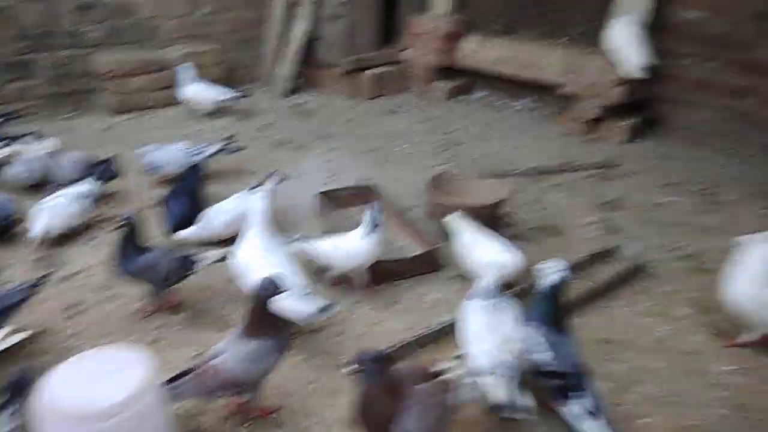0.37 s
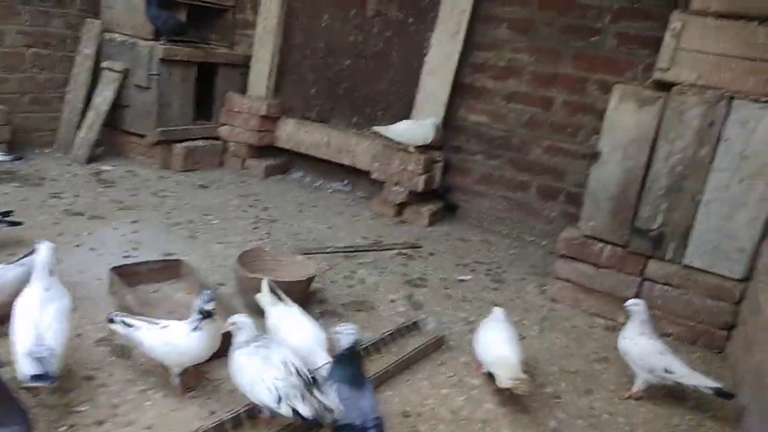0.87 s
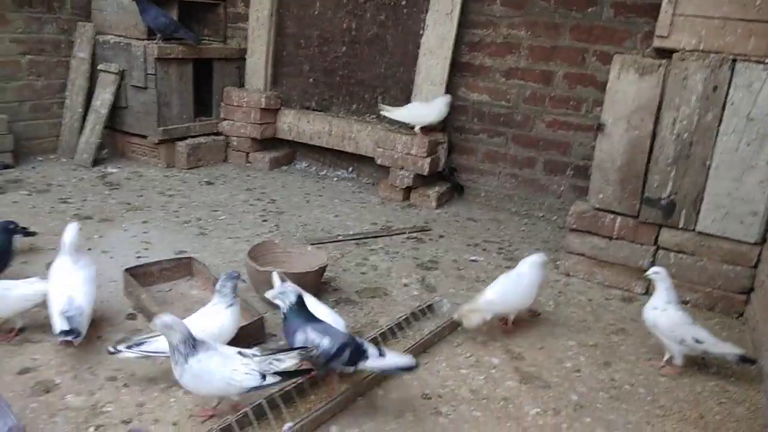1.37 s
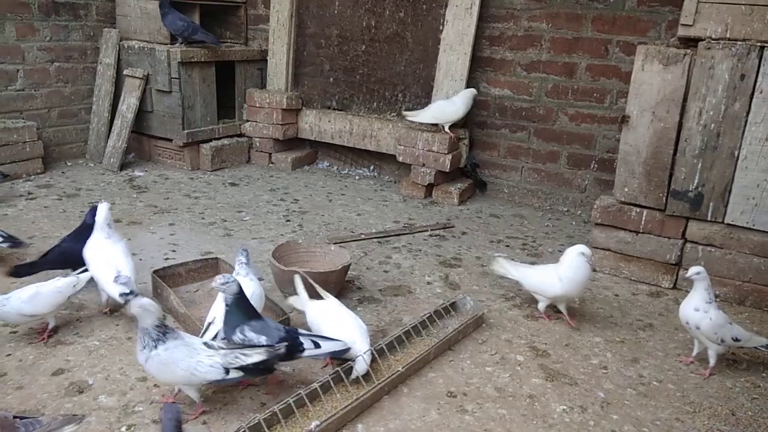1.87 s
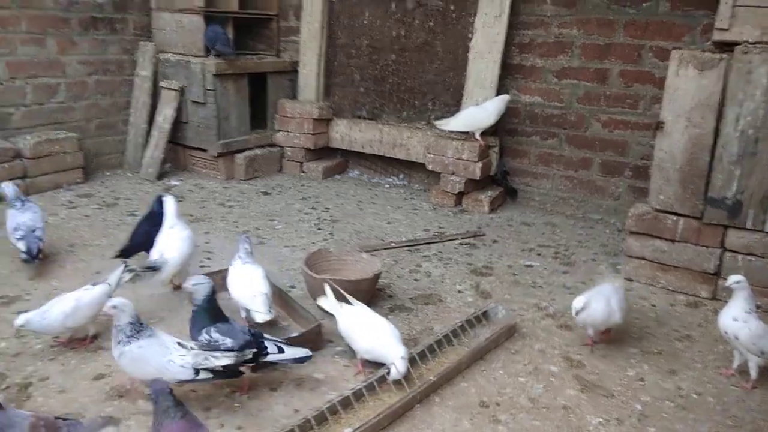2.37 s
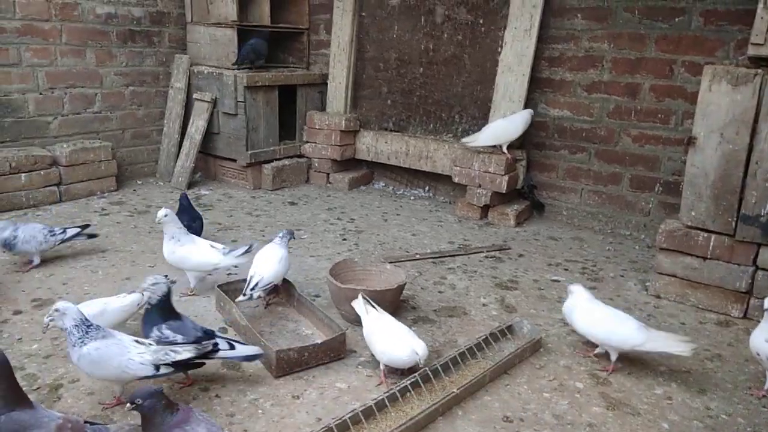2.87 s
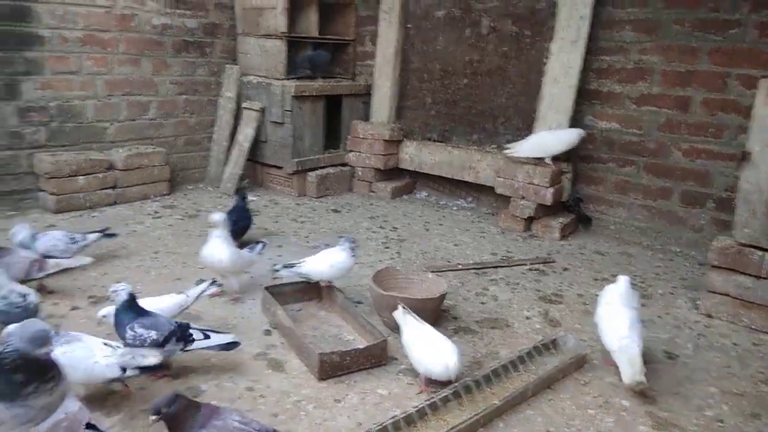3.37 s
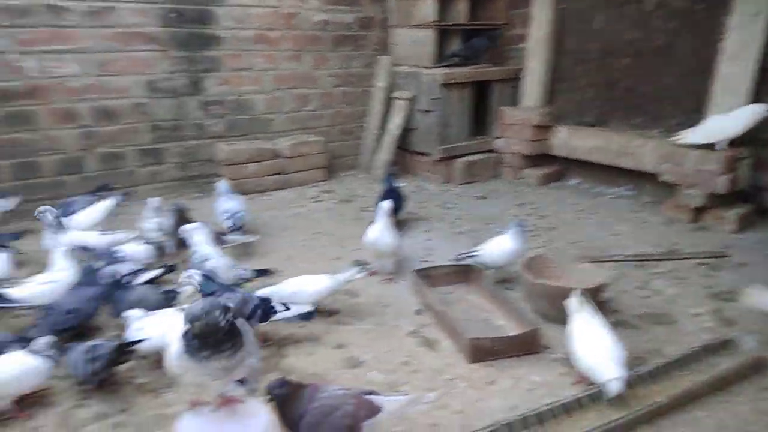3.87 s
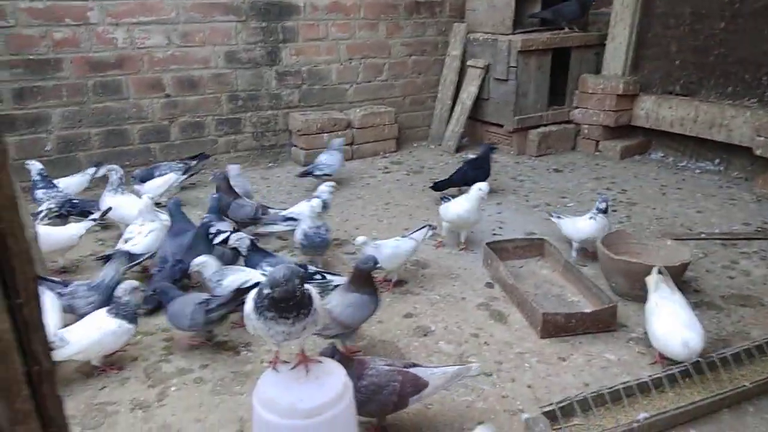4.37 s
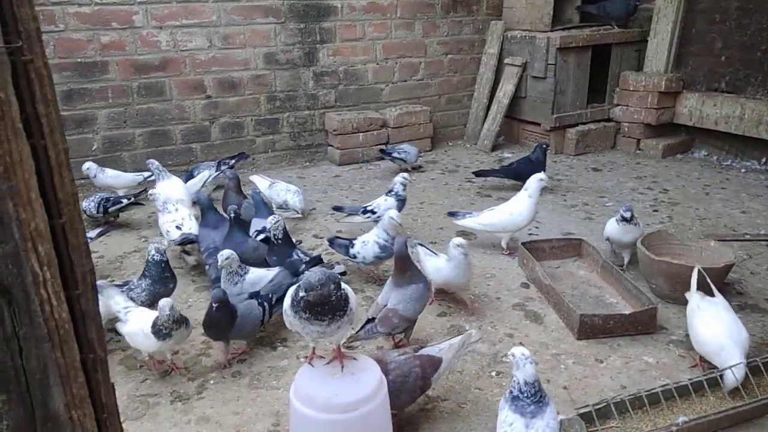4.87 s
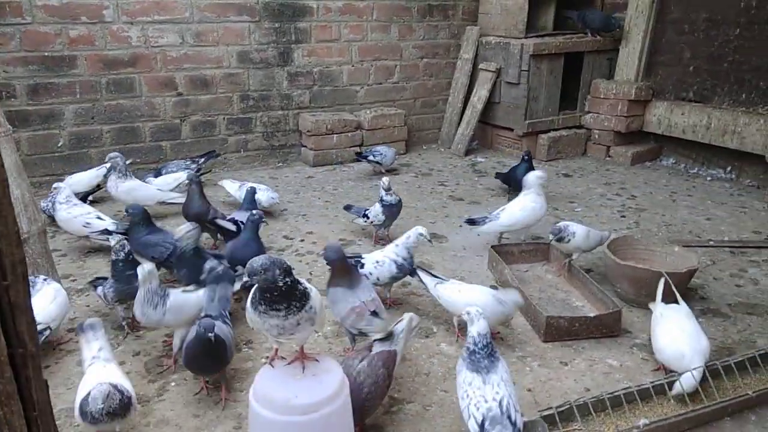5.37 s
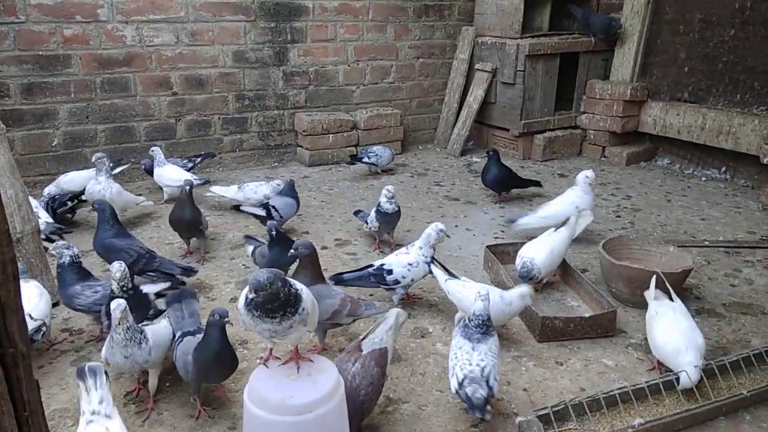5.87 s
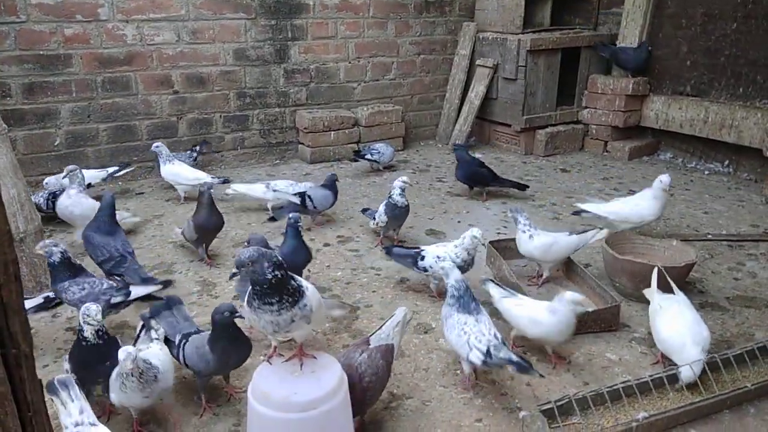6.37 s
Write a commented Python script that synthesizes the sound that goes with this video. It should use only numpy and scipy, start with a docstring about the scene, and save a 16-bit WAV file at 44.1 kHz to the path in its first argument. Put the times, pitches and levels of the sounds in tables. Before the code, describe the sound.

Many pigeons are heard close up on a dusty loft floor. Soft low cooing and hooting overlaps a flickering flock murmur. Crisp feather rustles come almost throughout, with a burst of flapping early on and tiny high squeaks. After four seconds liquid gulps cluster quickly into a rolling coo; then dry pecks and hollow taps stand out. Short, dull room echo; the bright hiss leans right because the left microphone is covered.

```python
"""A small brick loft with a flock of pigeons on its dusty floor.
Near birds gulp, hoot and coo: throat tones and puffs of air coloured by the swollen crop and the room.
Behind them many short hoots and flickering bands of noise form the murmur of the flock.
Feathers shake and wings flutter as shaped noise, beaks and claws ring the modes of a hollow trough,
and narrow bands of hiss rasp and squeak. The left microphone port is muffled."""
import sys
import numpy as np
from scipy import signal
from scipy.io import wavfile

SR = 44100
rng = np.random.default_rng(int(sys.argv[2]) if len(sys.argv) > 2 else 0)


def digitize_waveform(pressure):
    """Quantize a signal to 16-bit integers and store it at the path in sys.argv[1].

    Rows of a 2-D input are taken as channels; values are limited to [-1, 1].
    """
    field = np.atleast_2d(pressure).T
    bounded = np.clip(field, -1, 1)
    quanta = np.round(bounded * 32767).astype(np.int16)
    wavfile.write(sys.argv[1], SR, quanta)


def voltage_ratio(level):
    """Linear amplitude factor for a level in decibels (scalar or array-like)."""
    return 10 ** (np.asarray(level, float) / 20)


N = 286642

# What the crop lets out. Each row: frequency in Hz, gain in dB.
CROP_GAIN = [(200, -14), (320, -1), (430, 1.5), (520, -5.5), (620, -14), (700, -27.5), (900, -58)]
# Course of the murmur of the flock. Each row: time in seconds, level in dB.
MURMUR_COURSE = [(0, -37.5), (.2, -54.5), (.62, -43), (1.0, -41), (1.15, -50), (1.25, -40.5), (2.5, -41.5),
                 (2.8, -57), (2.95, -41), (3.15, -48.5), (3.55, -55), (4.0, -41), (4.92, -46), (5.8, -50),
                 (6.2, -51.5)]


def rms_one(x):
    """Normalization: scales a signal to unit root mean square."""
    return x / np.sqrt(np.mean(x ** 2) + 1e-20)


def in_time(rows):
    """Linear interpolation: draws each column of a table against its first column, the time in seconds."""
    seconds, *columns = np.transpose(rows)
    return [np.interp(np.arange(N) / SR, seconds, column) for column in columns]


def at_hz(points, hz):
    """Interpolation of a spectrum along a logarithmic frequency axis."""
    table_hz, values = np.transpose(points)
    return np.interp(np.log(hz), np.log(table_hz), values)


def drift(rate_hz):
    """Slow random modulation: noise smoothed by two equal low-pass poles, rms 1."""
    step = 20   # samples between the drawn points
    pole = np.exp(-2 * np.pi * rate_hz * step / SR)
    noise = rng.standard_normal(N // step + 2002)
    slow = signal.lfilter([1], [1, -2 * pole, pole * pole], noise)[2000:]   # settled part
    return np.interp(np.arange(N) / step, np.arange(len(slow)), rms_one(slow))


def banded_noise(spectrum, patchy_db, flicker_hz):
    """Subtractive synthesis: stereo noise in about third-octave bands with shared and own flicker; rms 1."""
    # Likeness of the two sides. Each row: frequency in Hz, left-right correlation.
    likeness = [(100, 0.93), (250, 0.96), (600, 0.41), (1200, 0.014)]
    out, together = 0, drift(flicker_hz)
    lowest_hz, highest_hz = spectrum[0][0], spectrum[-1][0]
    edges = lowest_hz * 2 ** np.arange(0, np.log2(highest_hz / lowest_hz) + .2, .34)
    white = rng.standard_normal((2, 2, N))   # neighbouring bands take turns with two noise pairs
    for k, (low, high) in enumerate(zip(edges, np.minimum(edges[1:], 19000))):
        band = signal.butter(2, [low, high], "band", fs=SR, output="sos")
        mid, side = signal.sosfilt(band, white[k % 2])
        hz = np.sqrt(low * high)
        alike = np.clip(at_hz(likeness, hz), -1, 1)
        flicker_db = patchy_db * (together + 2.27 * drift(flicker_hz))
        gain = voltage_ratio(at_hz(spectrum, hz) + flicker_db)
        out = out + gain * (np.sqrt(1 + alike) * mid + np.sqrt(1 - alike) * side * [[1], [-1]])
    return rms_one(out)


def tone(rows, roll, second_db, colour):
    """Source and filter: two wavering partials, coloured by the crop and throbbing with the throat's roll."""
    start, end = round(rows[0][0] * SR), round(rows[-1][0] * SR)
    hz, effort_db = (column[start:end] for column in in_time(rows))
    phase = 2 * np.pi * np.cumsum(hz * (1 + 0.0148 * drift(7.0)[start:end])) / SR
    throb_hz = 38 * (1 + .3 * drift(12)[start:end])
    throb = np.cos(2 * np.pi * np.cumsum(throb_hz) / SR)
    throb += 0.52 * drift(39)[start:end]   # hoarseness between the beats
    first = voltage_ratio(at_hz(colour, hz)) * np.sin(phase)
    second = voltage_ratio(second_db + at_hz(colour, 2 * hz)) * np.sin(2 * phase)
    rolled = (first + second) * (1 + np.clip(roll, 0, 1) * throb)
    fade = signal.windows.tukey(end - start, .12)
    out = np.zeros(N)
    out[start:end] = np.sqrt(2) * voltage_ratio(effort_db) * rolled * fade
    return out


def murmur():
    """Superposition: the voices of the flock merge into flickering bands of noise."""
    # Each row: frequency in Hz, relative density in dB per Hz.
    murmur_spectrum = [(80, -19.5), (150, -15), (210, -5.5), (300, 1), (430, -1), (560, -4.5), (800, -62)]
    level_db, = in_time(MURMUR_COURSE)
    return voltage_ratio(level_db) * banded_noise(murmur_spectrum, 2.6, 15.2)


def far_coos():
    """Frequency glide: birds further off give short falling hoots of two partials at random moments."""
    out, t = np.zeros(N + SR), np.arange(SR // 2) / SR
    for moment, pitch, length, size, upper in rng.random((140, 5)):
        hz, seconds = 185 + 150 * pitch, 0.011 + 0.23 * length ** 2
        phase = 2 * np.pi * hz * (t - 0.343 * t ** 2)
        throaty_roll = 1 + 0.24 * np.cos(2 * np.pi * (30 + 15 * upper) * t)
        swell = np.sin(np.pi * np.minimum(t / seconds, 1)) ** 2 * throaty_roll
        at = int(moment * N)
        out[at:at + len(t)] += voltage_ratio(2.4 * size) * swell * (np.sin(phase) + 0.48 * upper * np.sin(2 * phase))
    level_db, = in_time(MURMUR_COURSE)
    return voltage_ratio(level_db - 5.0) * rms_one(out[:N])


def far_whistle():
    """Random amplitude modulation: a fast wavering level makes a faint far whistle breathy."""
    # Each row: time in seconds, pitch in Hz, effort in dB.
    whistle_course = [(4.45, 1240, -63), (4.64, 1375, -58.5), (4.94, 1320, -73.5)]
    flat = [(1, 0)]   # 0 dB at every frequency
    return tone(whistle_course, .3, -18, flat) * (1 + .5 * drift(45))


def rustle_envelopes():
    """Exponential decay: each shake snaps, then dies away; returns dull and bright power envelopes."""
    # Shakes and scuffs. Each row: start in seconds, bright level in dB, dull level in dB re the bright one,
    # 60 dB decay time in seconds.
    rustle_rows = [(0.1405, -25, -8, 0.21), (0.6436, -36, -13, 0.35), (0.83, -26, -8, 0.31),
                   (0.9035, -23.5, -0.5, 0.44), (1.065, -27, -16, 0.13), (1.2007, -22, -5, 0.33),
                   (1.291, -27, -5, 1), (1.4, -20, -5, 0.4), (1.442, -18.5, -34, 0.18),
                   (1.736, -31.5, 7, 0.43), (1.8236, -19, -17, 0.43), (1.938, -16.5, -6, 0.3),
                   (2.116, -20.5, -11, 0.76), (2.337, -25, -3, 0.26), (2.6163, -21, -4, 0.19),
                   (2.743, -22, -17, 0.54), (2.8721, -14.5, -10, 0.17), (2.982, -23, -19, 0.13),
                   (3.211, -29.5, -7, 0.83), (3.601, -38.5, -0.5, 1), (3.7153, -31, -3.5, 0.48),
                   (3.8695, -25.5, -1.5, 0.25), (3.94, -27, -10, 0.42), (4.165, -27, -1.5, 0.24),
                   (4.232, -27, -10.5, 0.58), (4.565, -41.5, 1.5, 0.3), (4.88, -47, 4, 1),
                   (4.9729, -27.5, -0.5, 0.56), (5.062, -26, -7, 0.29), (5.1776, -19, -17, 0.33),
                   (5.1982, -22, -2, 0.39), (5.279, -23.5, -3, 0.23), (5.36, -27.5, -31, 0.28),
                   (5.495, -32, 4.5, 0.45), (5.7313, -23, -6, 0.47), (5.8727, -26.5, -3, 0.38),
                   (6.0616, -25.5, 0.5, 0.47), (6.184, -19.5, -11, 0.24), (6.3993, -33, 0, 0.93)]
    dull, bright, t = np.zeros(N + SR), np.zeros(N + SR), np.arange(SR // 2) / SR
    for s, bright_db, dull_db, t60 in rustle_rows:
        snap = 0.74 * np.exp(-t / 0.00017)
        shape = voltage_ratio(-60 * t / t60) * (1 - 0.36 * np.exp(-t / 0.0054)) + snap
        at = round(s * SR)
        bright[at:at + len(t)] += (voltage_ratio(bright_db) * shape) ** 2
        dull[at:at + len(t)] += (voltage_ratio(bright_db + dull_db) * shape) ** 2
    return dull[:N], bright[:N]


def feathers():
    """Friction noise: shakes hiss, grainy from barbs snapping; wings add lumpy low air and a bright swish."""
    # Wing flutter in time. Each row: time in seconds, low part in dB, bright part in dB.
    flutter_course = [(0, -50, -47), (.18, -45.5, -44.5), (.45, -55.5, -64.5), (.8, -56.5, -62),
                      (1.0, -61, -63), (1.25, -42.5, -50), (1.6, -44, -43), (2.1, -36, -38.5),
                      (2.8, -45, -43), (2.95, -47.5, -49), (3.15, -53.5, -63), (4.3, -53, -81.5),
                      (4.6, -56, -80), (4.87, -72.5, -78.5), (5.8, -57, -84), (6.2, -45, -50.5),
                      (6.4, -57.5, -90)]
    # Three spectra: dull hiss, bright hiss, air under the wings.
    # Each row: frequency in Hz, relative density in dB per Hz.
    dull_spectrum = [(420, -5.5), (1100, -2.5), (2100, -2.5), (2700, -7.5), (4000, -9)]
    bright_spectrum = [(1800, -9.5), (3500, -7.5), (5000, -4.5), (9500, 1.5), (13000, 5), (16500, -27)]
    wing_spectrum = [(50, -14), (90, -7.5), (180, 4), (400, -2.5), (700, 1.5), (1100, -7.5), (1550, -4.5),
                     (1900, -10), (4000, -18.5)]
    low_db, bright_db = in_time(flutter_course)
    dull, bright = rustle_envelopes()

    snaps_per_s = 70
    barbs = (rng.random(N) < snaps_per_s / SR) * np.minimum(rng.exponential(0.39, N), 2.2)
    grain = 1 + signal.lfilter([1], [1, -.985], barbs)   # each snap decays within milliseconds

    swish = voltage_ratio(bright_db) * banded_noise(bright_spectrum, 1.4, 29)
    shake_top = signal.butter(2, 9870, fs=SR, output="sos")
    bright_hiss = signal.sosfilt(shake_top, banded_noise(bright_spectrum, 1.48, 26))
    dull_hiss = banded_noise(dull_spectrum, 1.5, 25)
    crest_db = 11   # allowance for the peaks of a shake over its rms
    shakes = voltage_ratio(-crest_db) * (np.sqrt(dull) * dull_hiss + np.sqrt(bright) * bright_hiss)
    air = voltage_ratio(low_db) * banded_noise(wing_spectrum, 1.9, 14)
    return grain * (shakes + swish) + air


def wingbeats():
    """Air displacement: as a bird flaps up, each downstroke pushes a low lump of air and a short dull puff."""
    beats, first_s, beat_s = 6, 1.6, 0.112
    push_hz, push_db, puff_db = 92, -47, -34.5
    swell, push, t = np.zeros(N), np.zeros(N), np.arange(SR // 8) / SR
    for k, (late, size) in enumerate(rng.standard_normal((beats, 2))):
        at = round((first_s + k * beat_s + 0.0012 * late) * SR)
        shape = t / 0.015 * np.exp(1 - t / 0.015) * voltage_ratio(0.94 * size)
        swell[at:at + len(t)] += shape
        push[at:at + len(t)] += shape * np.sin(2 * np.pi * push_hz * t)
    band = signal.butter(2, [180, 1100], "band", fs=SR, output="sos")
    puff = rms_one(signal.sosfilt(band, rng.standard_normal((2, N))))
    return voltage_ratio(push_db) * push + voltage_ratio(puff_db) * swell * puff


def knocks():
    """Modal synthesis: beaks and claws tap a hollow trough with a dry crack and wake its modes unevenly."""
    # Each row: time in seconds, dry crack level in dB, hollow ring level in dB,
    # frequency in Hz that the struck spot favours.
    tap_rows = [(2.8726, -17, -32.5, 950), (2.984, -22, -36.5, 800), (3.719, -33, -40, 1970),
                (3.87, -37.5, -37.5, 1780), (4.981, -27, -26, 1920), (5.176, -26.5, -42, 2100),
                (5.2798, -24, -54, 1610), (5.3619, -29.5, -45.5, 1400), (5.5072, -30, -36.5, 1090),
                (6.064, -35.5, -32, 2080), (6.195, -29.5, -25.5, 760), (6.4, -44, -31.5, 1550)]
    # Each row: mode frequency in Hz, relative level in dB, 60 dB decay time in seconds.
    trough_modes = [(727, -10.5, 0.15), (920, -1.5, 0.028), (1398, -9.5, 0.053), (1900, -11.5, 0.058),
                    (2088, -3.5, 0.041), (3010, -2, 0.036)]
    spot_loss_db = 10.5   # per octave squared away from the favoured frequency
    scuff_s, scuff_db = 0.013, -25   # the beak drags on after the blow
    out, t = np.zeros((2, N + SR)), np.arange(SR // 8) / SR
    for s, crack_db, ring_db, spot_hz in tap_rows:
        noise = rng.standard_normal((2, len(t)))
        crack = signal.lfilter([1, 1, -1, -1], [2], noise) * np.exp(-t / 0.0012)
        ring = np.zeros(len(t))
        for (hz, db, t60), chance in zip(trough_modes, rng.standard_normal(len(trough_modes))):
            mode_db = db + 2.0 * chance - spot_loss_db * np.log2(hz / spot_hz) ** 2
            ring += voltage_ratio(mode_db - 60 * t / t60) * np.sin(2 * np.pi * hz * t)
        drag = noise[1] * np.exp(-t / scuff_s)
        ring += voltage_ratio(scuff_db) * signal.fftconvolve(ring, drag)[:len(t)]
        at = round(s * SR)
        out[:, at:at + len(t)] += voltage_ratio(crack_db) * crack + voltage_ratio(ring_db) * ring
    return out[:, :N]


def squeaks():
    """Narrow-band noise: hoarse rasps low down and thin squeaks at the top start sharply and die away."""
    # Each row: start in seconds, centre in Hz, starting level in dB, 60 dB decay time in seconds.
    squeak_rows = [(0.548, 1510, -57, 1.2), (0.735, 12040, -47, 0.2), (1.003, 1390, -42.5, 0.25),
                   (1.43, 13500, -37, 0.19), (2.04, 13300, -38, 0.27), (3.38, 12400, -42, 0.25),
                   (3.595, 835, -46.5, 0.76), (4.62, 12440, -57.5, .8), (5.03, 890, -46, 0.26),
                   (6.42, 1500, -47, 1.7)]
    half_width_hz = 135
    out, t = np.zeros(N + SR), np.arange(SR // 2) / SR
    fade = np.cos(np.pi * t)   # reaches zero at half a second
    for s, hz, db, t60 in squeak_rows:
        band = signal.butter(2, [hz - half_width_hz, hz + half_width_hz], "band", fs=SR, output="sos")
        hiss = rms_one(signal.sosfilt(band, rng.standard_normal(len(t))))
        at = round(s * SR)
        out[at:at + len(t)] += voltage_ratio(db - 60 * t / t60) * fade * hiss
    return out[:N]


def hoots():
    """Falling pitch: the tone sinks, faster at first, and the breath runs out at the end."""
    # Each row: start in seconds, length in seconds, first pitch in Hz, last pitch in Hz, effort in dB,
    # second partial in dB re the first at the throat.
    hoot_rows = [(0.195, 0.29, 278.2, 203.8, -35.5, -5.5), (1.375, 0.21, 246.7, 203, -50.5, 9),
                 (1.603, 0.2, 282.1, 194.7, -26, -14), (2.104, 0.32, 244.2, 195.4, -35.5, -25),
                 (5.575, 0.122, 306, 249.7, -46.5, 5), (6.095, 0.13, 297.4, 208, -27.5, -16)]
    bend, end_loss_db, throb_depth = 0.68, 2.5, 0.35   # bend: share of the fall done half-way
    out = np.zeros(N)
    for s, length, top_hz, low_hz, db, second_db in hoot_rows:
        middle_hz = top_hz + bend * (low_hz - top_hz)
        course = [(s, top_hz, db), (s + length / 2, middle_hz, db), (s + length, low_hz, db - end_loss_db)]
        out += tone(course, throb_depth, second_db, CROP_GAIN)
    return out


def gulps():
    """Cavity resonance: a puff of air rings the crop, swelling fast, sagging in pitch, with after-beats."""
    # Each row: nominal time in seconds, puff level in dB, nominal crop frequency in Hz.
    gulp_rows = [(0.06, -36, 496), (0.815, -27, 426), (0.85, -23.5, 265), (0.879, -28, 657),
                 (0.915, -16.5, 352), (1.024, -28, 551), (1.089, -9.5, 374.4), (1.147, -24, 400),
                 (1.329, -20.5, 416), (2.36, -27, 399), (2.519, -22, 241), (2.573, -17, 304),
                 (2.678, -11, 384), (2.88, -27.5, 439), (3.874, -27.5, 223), (4.036, -25.5, 268),
                 (4.09, -23.5, 286), (4.172, -11, 367.5), (4.276, -14, 352), (4.413, -23, 333),
                 (4.459, -10, 357), (4.497, -17.5, 386), (4.526, -14.5, 308), (4.586, -16, 362),
                 (4.605, -10, 371), (4.646, -10.5, 346), (4.688, -16, 371), (4.709, -19.5, 327),
                 (4.856, -31, 210), (5.458, -24, 423), (5.495, -31, 458), (6.194, -28.5, 433)]
    out, t = np.zeros(N + SR), np.arange(SR // 8) / SR
    swell = (t / .011 * np.exp(1 - t / .011)) ** 5.65
    for s, puff_db, hz in gulp_rows:
        phase = 2 * np.pi * hz * (1.093 * t - 2.22 * t ** 2)
        second = voltage_ratio(at_hz(CROP_GAIN, 2 * hz) - 8.5) * swell * np.sin(2 * phase)
        puff = voltage_ratio(puff_db) * swell * (np.sin(phase) + second)
        for lag_s, gain_db in [(-.005, -1), (.013, -13.5), (.031, -17)]:
            at = round((s + lag_s) * SR)
            out[at:at + len(t)] += voltage_ratio(gain_db) * puff
    return out[:N]


def coos():
    """Amplitude modulation: the throat rolls each held coo while pitch and effort follow a drawn course."""
    # Each row: throb depth from 0 to 1, second partial in dB re the first at the throat,
    # course as a list of (time in seconds, pitch in Hz, effort in dB).
    coo_rows = [ (0.39, -18, [(1.21, 313.3, -26.5), (1.25, 249.7, -37), (1.356, 269, -24.5),
                (1.45, 286.7, -29), (1.56, 297, -29)]), (0.63, -3, [(1.4, 345.7, -31), (1.48, 334, -36),
                (1.59, 315.3, -24.5), (1.64, 324, -43)]), (0.051, -9.5, [(2.92, 412, -27),
                (2.944, 423, -24.5), (2.985, 296.7, -27.5), (3.12, 306.6, -27.5), (3.17, 304.4, -31),
                (3.24, 317, -28), (3.36, 299.3, -30), (3.416, 264, -26.5), (3.45, 196, -27),
                (3.49, 192, -50)]), (0.6, -13.5, [(4.58, 367.1, -25.5), (4.725, 324.2, -23),
                (4.78, 314.6, -22.5), (4.81, 318, -30), (4.84, 297, -31)]), (0.28, -13, [(5.86, 476, -25),
                (5.885, 419, -34.5), (5.91, 323.7, -24.5), (6.08, 332, -30.5), (6.14, 342, -32.5)]), ]
    return sum(tone(course, throb, second_db, CROP_GAIN) for throb, second_db, course in coo_rows)


def loft(x):
    """Reverberation: eight feedback delays a side, duller on every round."""
    t60_s, wall_cut_hz = 0.15, 13000
    out, dull = np.zeros((2, N)), np.exp(-2 * np.pi * wall_cut_hz / SR)
    for k, lag in enumerate((rng.uniform(0.01, 0.036, 16) * SR).astype(int)):
        loop, gain, state = x.copy(), voltage_ratio(-60 * lag / SR / t60_s), [0.]
        for i in range(lag, N, lag):
            back, state = signal.lfilter([gain * (1 - dull)], [1, -dull], loop[i - lag:i], zi=state)
            loop[i:i + lag] += back[:N - i]
        out[k % 2] += (loop - x) * (-1) ** (k // 2)   # echoes alone, with alternating sign
    return out


def scene():
    """Linear superposition: direct voices, their echoes, the murmur, feathers and small sounds add up."""
    voices = far_coos() + far_whistle() + hoots() + gulps() + coos()
    direct = voices * voltage_ratio(np.array([[.8], [-.8]]))   # slightly stronger on the left
    echoes = voltage_ratio(-7.5) * loft(voices)
    return murmur() + feathers() + wingbeats() + knocks() + squeaks() + echoes + direct


def top_cut(x):
    """Nothing passes above the cut-off."""
    return signal.sosfilt(signal.butter(12, 16670, fs=SR, output="sos"), x)


def record(dry):
    """Low-pass filtering: the covered left port keeps only a small leak of treble; the bass is cut."""
    cover = signal.butter(2, 3300, fs=SR, output="sos")
    muffled = signal.sosfilt(cover, dry[0]) * voltage_ratio(-0.1) + voltage_ratio(-29.5) * dry[0]
    bass_cut = signal.butter(1, 70, "high", fs=SR, output="sos")
    both = signal.sosfilt(bass_cut, [muffled, dry[1]])
    return top_cut(both)


dry = scene()
out = record(dry)
digitize_waveform(out)
```